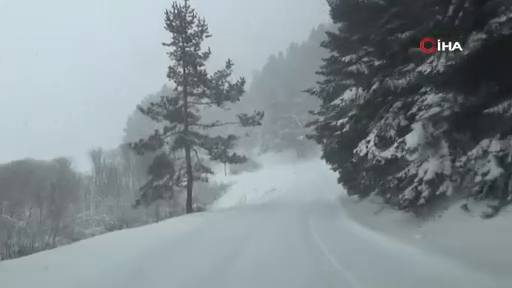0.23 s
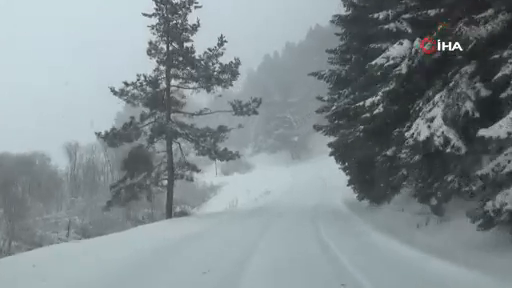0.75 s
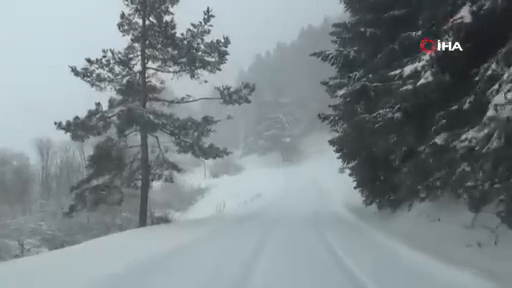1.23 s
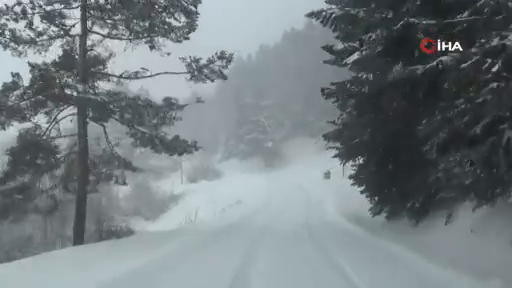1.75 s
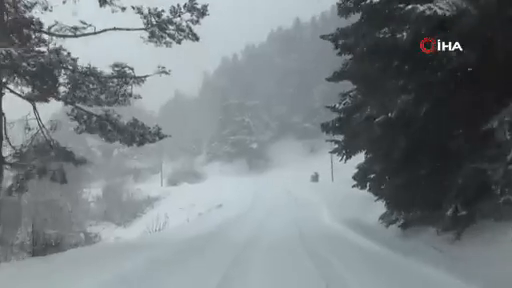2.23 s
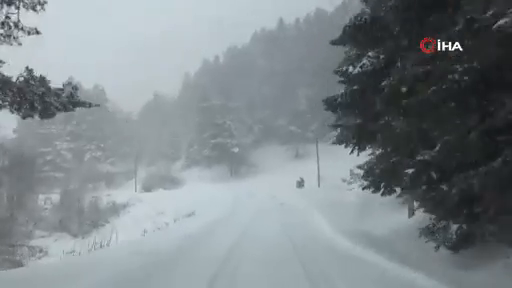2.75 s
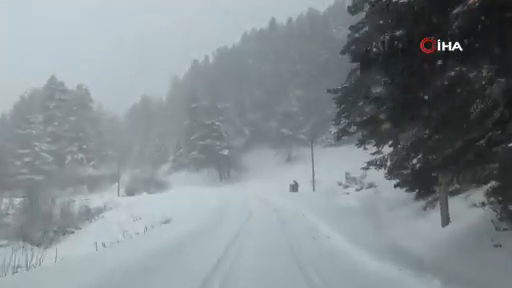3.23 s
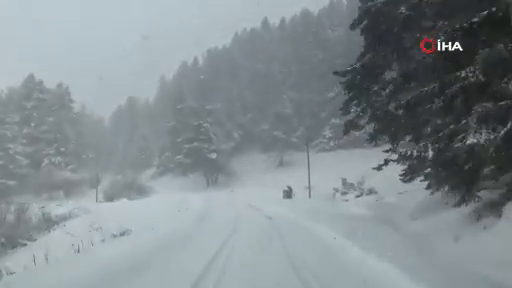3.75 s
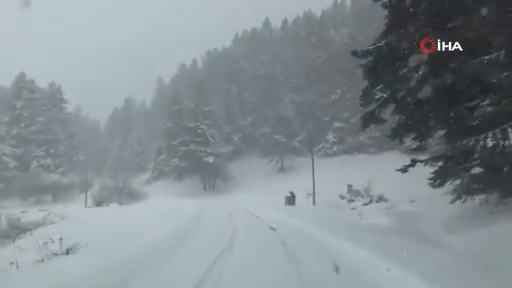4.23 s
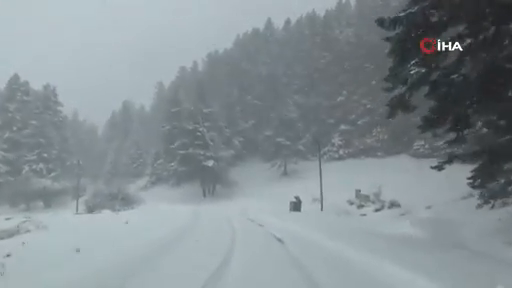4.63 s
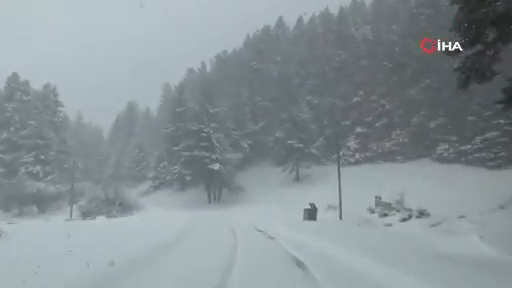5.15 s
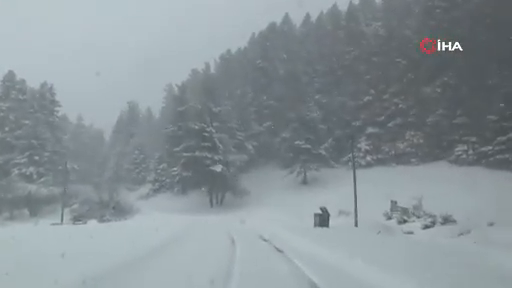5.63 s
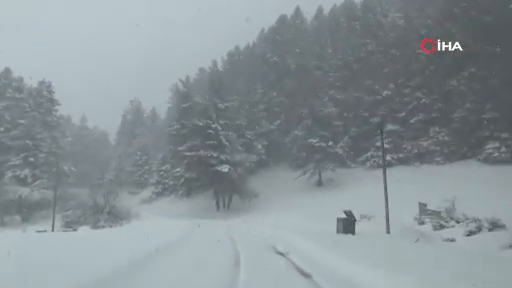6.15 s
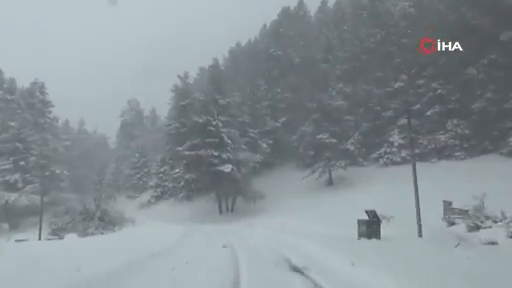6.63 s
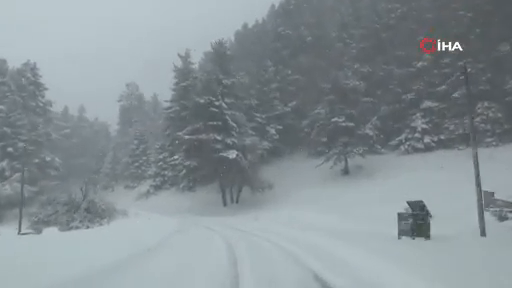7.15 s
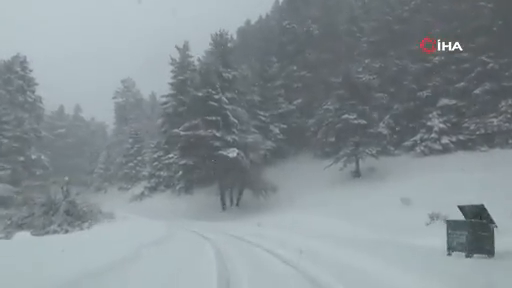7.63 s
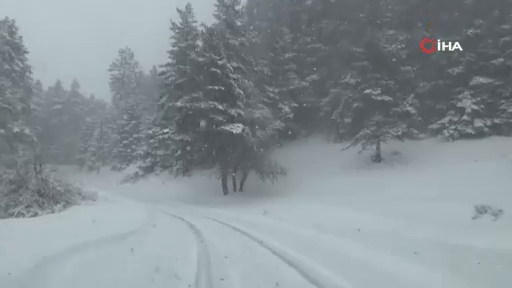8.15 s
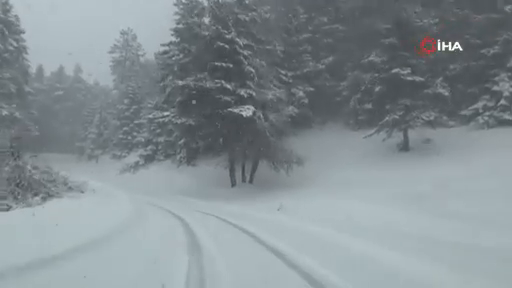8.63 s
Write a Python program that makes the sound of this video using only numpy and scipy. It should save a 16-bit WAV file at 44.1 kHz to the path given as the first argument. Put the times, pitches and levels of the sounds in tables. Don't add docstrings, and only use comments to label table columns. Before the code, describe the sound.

Inside a car rolling along a rough snowy track: deep booming rumble, low engine hum, soft snow hiss, ticking ice crumbs and late suspension thumps.

```python
import sys
import numpy as np
from scipy import signal
from scipy.io import wavfile
from scipy.ndimage import uniform_filter1d

SR = 44100
rng = np.random.default_rng(int(sys.argv[2]) if len(sys.argv) > 2 else 0)


def magnitude_from_level(level_db):
    exponent = np.asarray(level_db, float) / 20
    return 10 ** exponent


def int16_out(signal):
    q = np.round(np.clip(np.atleast_2d(signal).T, -1, 1) * 32767)
    wavfile.write(sys.argv[1], SR, q.astype(np.int16))


N = 392490


def evened(x):
    return x / np.sqrt(np.mean(x ** 2) + 1e-20)


def read(points, hz):
    f, value = np.transpose(points)
    return np.interp(np.log(hz + 1), np.log(f + 1), value)


def column(rows, t, order):
    rows = np.array(rows)
    return np.interp(t, rows[:, 0], rows[:, order])


def add(mix, s, sound):
    part = mix[:, round(s * SR):][:, :sound.shape[-1]]
    part += sound[..., :part.shape[1]]


def band(x, lo_hz, hi_hz):
    return signal.sosfilt(signal.butter(2, [lo_hz, hi_hz], "bandpass", fs=SR, output="sos"), x)


# [f/Hz, likeness 0-1]
LIKENESS = [(25, 0.999), (60, 0.995), (120, 1), (240, 0.65), (470, 0.81), (930, 0.55), (1840, 0.65),
            (3660, 0.46), (7250, 1), (14400, 1)]
# [f/Hz, level/dB]
LEFT_LEAN = [(60, -0.6), (130, 2.5), (290, -3.5), (630, -1), (1370, -1.5), (3010, -0.5), (6580, 0.5),
             (14400, -1)]
# [f/Hz, phase/rad]
LEFT_LEAD = [(25, -0.13), (60, -0.23), (125, -0.4), (260, -0.52), (520, -0.32), (1030, -0.63),
             (1810, -0.16), (2330, 0.064), (5080, 0.14), (7750, 0.73), (9910, 0.3), (14600, 0.2)]


def wash(size, colour_db, layers, patchy_db, flicker_db, steady):
    hop = size // 4
    frames, hz = N // hop + 5, np.fft.rfftfreq(size, 1 / SR)
    a, b, c, d, patches = rng.standard_normal((frames, len(hz), 5)).T
    patches = uniform_filter1d(patches, size=8, axis=0)
    patches = evened(uniform_filter1d(patches, size=10, axis=1))
    flicker = evened(uniform_filter1d(rng.standard_normal(frames), size=6))

    same = np.clip(read(LIKENESS, hz), 0, 1)[:, None]
    left = a + 1j * b
    right = same * left + np.sqrt(1 - same ** 2) * (c + 1j * d)
    right = right * np.exp(-1j * read(LEFT_LEAD, hz))[:, None]
    lean = magnitude_from_level(read(LEFT_LEAN, hz) / 2)[:, None]
    shade_db = colour_db(hz)[:, None] + patchy_db * patches + flicker_db * flicker
    z = np.array([left * lean, right / lean]) * magnitude_from_level(shade_db)

    out = np.zeros((2, N))
    for lo, hi, level_db in layers:
        share = 1 / np.sqrt((1 + (lo / (hz + 1)) ** 12) * (1 + (hz / hi) ** 12))
        part = signal.istft(z * share[:, None], nperseg=size, noverlap=size - hop)[1][:, :N]
        power = uniform_filter1d((evened(part) ** 2).mean(0), size=3000)
        part = part / (power + .05) ** (steady / 2)
        out += evened(part) * magnitude_from_level(np.interp(np.arange(N) / 64, np.arange(len(level_db)), level_db))
    return out


# [t/s, shaking level/dB]
ROAD = [(0.0, -17.5), (0.02, -17.5), (1.43, -17), (1.58, -12), (1.66, -19.5), (1.98, -11), (2.08, -16),
        (6.96, -13.5), (7.16, -20.5), (7.63, -14), (8.7, -16), (8.9, -15)]
# [t/s, boom lift/dB, drone lift/dB]
SURGES = [(0.02, -1.5, 7.5), (0.35, 5.5, -4), (.72, 5.5, 3.5), (1.2, 1, 3.5), (1.57, 6, -8), (1.8, 2, -3),
          (2.45, 5, -7), (2.04, 4, -5), (2.11, -4, 1.5), (2.68, 6.5, -1), (2.82, -10.5, -2.5),
          (3.07, 0.5, 5.5), (3.47, 5, 1), (3.69, 2.5, 3.5), (3.77, 6, -8), (3.87, -8, 2.5), (4.02, -1.5, 3.5),
          (4.21, 0, 0), (4.45, 1, 0.5), (4.68, 6, 4), (5.06, 1, -5), (5.36, -4, -1.5), (5.6, 1.5, -5),
          (6.08, -3, 4.5), (6.4, 1.5, 0.5), (6.96, -8.5, 4.5), (7.4, -1, 2.5), (7.6, 3.5, 0.5),
          (7.82, -6, 3.5), (8.1, -1, 2.5), (8.4, -3.5, 3), (8.62, -2, 1.5), (8.75, 0.5, 2.5)]


def shake_db(t, order):
    half_width_s = 0.065
    swells = sum(surge[order] * np.exp(-((t - surge[0]) / half_width_s) ** 2) for surge in SURGES)
    return column(ROAD, t, order=1) + swells


# [f/Hz, level/dB per Hz]
BODY = [(8.8, -36), (15, -5.5), (49, 2), (80, -2), (154, -9), (210, -18), (618, -26.5), (875, -35),
        (1020, -36), (1500, -42.5), (1950, -75), (3300, -120)]
# [f/Hz, width/Hz, lift/dB]
CABIN = [(46, 8.8, -2), (64.5, 17, 4), (98.6, 25, 3), (150.6, 25, 7), (256.7, 33, 4.5), (324.5, 74, 3.5),
         (565, 38, -1), (1110, 600, 1)]


def body_colour(hz):
    lifts = sum(db / (1 + (2 * (hz - f) / width) ** 2) for f, width, db in CABIN)
    return read(BODY, hz) + lifts


# [t/s, level/dB]
LOAD = [(0, -3.5), (1.2, -2.5), (2.5, -4.5), (4, -1.5), (4.8, -9.5), (5.1, -0.5), (5.5, 1.5), (6.3, 0),
        (7.2, -0.5), (7.8, 0), (8.35, 2.5), (8.9, -3.5)]


def rumble():
    t = np.arange(0, N, 64) / SR
    load_db = column(LOAD, t, order=1)
    boom = -3.5 + shake_db(t, order=1)
    drone = -7 + shake_db(t, order=2) + 0.24 * load_db + 0.26 * (t - t.mean())
    roar = -28.5 + 0.096 * load_db
    layers = [(0, 85, boom), (85, 200, drone), (200, 1400, roar)]
    return wash(size=8192, colour_db=body_colour, layers=layers,
                patchy_db=1.35, flicker_db=0.42, steady=0.25)


# [t/s, f/Hz, level/dB]
ENGINE = [(0.0, 55.67, -18), (1.56, 47.02, -28), (1.68, 53.16, -14.5), (2.68, 48.17, -15.5),
          (3.37, 56.46, -13.5), (4.34, 46.1, -20), (5.06, 55.64, -14), (5.23, 45.87, -36),
          (6.62, 52.2, -18.5), (8.63, 47.5, -10), (8.9, 42.7, -26)]


def engine():
    t = np.arange(N) / SR
    hz = uniform_filter1d(column(ENGINE, t, order=1), size=8000)
    turn = 2 * np.pi * np.cumsum(hz) / SR
    level_db = column(ENGINE, t, order=2) - 9.0 + np.array([[.4], [-.4]])
    return magnitude_from_level(level_db) * np.sqrt(2) * (np.sin(turn) + magnitude_from_level(-4) * np.sin(2 * turn))


# [f/Hz, width/Hz, level/dB, how far it follows the load/dB per dB, lag/s]
DOOR_MODES = [(611, 99, -41.5, 1.4, 0.063), (597.5, 17.3, -45.5, 2.1, 0.05), (1040, 155, -46, 1.44, 1.27)]


def hum():
    out, t = np.zeros((2, N)), np.arange(N) / SR
    for hz, width, db, follows, lag in DOOR_MODES:
        z = rng.standard_normal((3, N))
        ring = band(z[0] + 0.74 * z[1:], hz - width / 2, hz + width / 2)
        out += evened(ring) * magnitude_from_level(db + follows * column(LOAD, t - lag, order=1))
    return out * magnitude_from_level(np.array([[-.7], [.7]]))


# [t/s, crunch level/dB, time to fade 6 dB/s (0.01 at least),
# spray over crunch/dB]
DRIFTS = [(0.0, -40, -0.1, -4), (.29, -47.5, -0.67, -3), (.92, -55, 1.7, -5.5), (1.24, -47.5, 0.53, -5.5),
          (1.44, -53, -1.7, -9), (1.75, -55, -0.26, -11), (2.02, -44.5, 0.32, -5.5), (2.31, -45, .04, 2),
          (2.75, -50, .45, -1), (3.34, -49, 0.3, -7), (3.63, -47, 0.43, -3.5), (3.97, -41, 0.1, -4.5),
          (4.08, -47.5, 0.1, -6), (4.2, -50, -0.1, -7), (4.26, -43.5, 0.06, -3.5), (4.47, -47.5, 0.1, -16),
          (4.55, -50.5, 0.21, 3), (5.05, -46, -0.23, -2), (5.4, -45.5, 0.35, -7), (5.78, -51, 0.07, 1),
          (6.08, -41.5, 0.09, -7.5), (6.44, -45.5, 0.06, -1.5), (6.64, -42.5, 0.2, -7),
          (6.89, -39.5, 0.01, 1), (7.06, -42, .06, -6.5), (7.28, -51, .03, -4), (7.47, -44.5, .1, -4.5),
          (7.81, -43.5, 0.08, -3), (8.1, -47.5, 0.15, -6), (8.25, -44.5, 0.09, 2), (8.32, -42, 0, -6),
          (8.6, -43, -0.03, -3), (8.38, -43.5, 0, 1), (8.66, -45.5, 0.24, -3), (8.73, -64, -4, -7)]


def drifts(t, base_db, bright):
    power = sum(magnitude_from_level(db + bright * tilt - 6 * abs(t - s) / max(fall, .01)) ** 2
                for s, db, fall, tilt in DRIFTS)
    return 10 * np.log10(magnitude_from_level(base_db) ** 2 + power)


# [f/Hz, level/dB per Hz]
SPRAY = [(760, -5), (1300, 3), (1460, -1.5), (2180, -2), (2770, -7), (5500, -13), (8520, -9), (9310, -12.5),
         (14000, -29.5)]


def snow():
    crumbs_per_s, crumbs_db, fade_s = 150, -7, 0.003
    t = np.arange(0, N, 64) / SR
    crunch = drifts(t, base_db=-51, bright=0)
    spray = drifts(t, base_db=-53, bright=1)
    hiss = wash(size=256, colour_db=lambda hz: read(SPRAY, hz),
                layers=[(1400, 3800, crunch), (3800, 22050, spray)],
                patchy_db=1.4, flicker_db=1.5, steady=0)
    size = magnitude_from_level(4.7 * np.minimum(rng.exponential(1, N), 4))
    size = size * (rng.random(N) < crumbs_per_s / SR)
    puffs = signal.lfilter([1], [1, -np.exp(-1 / (fade_s * SR))], size)
    return hiss * np.sqrt(1 + magnitude_from_level(crumbs_db) * puffs) * magnitude_from_level(-1.27)


# [t/s, bright peak level/dB, body relative to bright/dB, thud relative to bright/dB]
TICKS = [(0.2723, -34, -12, -13), (0.3122, -32, -12, -6), (0.7477, -29.5, -13, -10),
         (0.9837, -27.5, -23, -13), (1.1458, -36, -9, -8), (1.4296, -32.5, -9, -5), (1.5643, -31, -5.5, -6),
         (1.6232, -16, -13.5, -20), (1.735, -36, -12, -1), (1.7604, -35, -15, 0), (1.9235, -33, -15, -10),
         (1.9919, -26, -12, -19), (2.9307, -34.5, -21, -7), (2.9414, -40, -19, -17),
         (2.9716, -39.5, -18, -8), (3.0784, -36.5, -7, -15), (3.2395, -39, -8, -11),
         (3.2765, -37.5, -10, -6), (3.2899, -29.5, -17, -11), (3.3887, -30, -12, -13),
         (3.6441, -22.5, -18, -19), (3.9464, -30.5, -12, -17), (3.9524, -23, -24, -22),
         (3.9604, -27, -12, -8), (3.9964, -29.5, -13, -6), (4.0307, -30, -16.5, -11),
         (4.0607, -32, -15, -8), (4.1001, -36, -17, -1), (4.1904, -39.5, -11, -2), (4.2358, -28, -14, -12),
         (4.2702, -27.5, -11, -15), (4.3036, -36, -18, -8), (4.3555, -42, -8, 2), (4.4034, -40, -18, -6.5),
         (4.4383, -29, -21, -7.5),
         (4.7017, -29.5, -12, -16), (4.762, -38, -11, -11), (4.8184, -30.5, -16, -8),
         (5.028, -25, -22, -13), (5.318, -26, -12, -18), (5.3517, -31.5, -11, -8), (5.484, -42, -7, -1),
         (5.501, -32, -13, -8), (5.6974, -30.5, -13, -5), (5.8606, -29, -18, -11), (5.9144, -34, -13, -29),
         (5.9278, -26, -19, -18), (6.427, -24, -22, -15), (6.5201, -33, -9, -10), (6.8828, -32, -14, -4),
         (7.227, -36.5, -8.5, -7), (7.2734, -32.5, -21, -3), (7.5225, -31, -27, -11),
         (7.7094, -23, -13, -14), (7.8316, -26.5, -23, -18), (7.8725, -23.5, -25, -14),
         (7.9139, -37, -6, -7), (8.0431, -30, -22, -6), (8.1054, -31, -16, -6), (8.2237, -29, -27, -17),
         (8.3809, -32, -14, -3), (8.6792, -27.5, -8, -3), (8.7137, -31, -10, -7), (8.7241, -24, -24, -20),
         (8.8264, -37, -8.5, -1),
         (2.31, -25, -11, -9),
    (2.523, -25, -12, -13),
    (2.726, -37, -8, -6),
    (5.929, -20, -12, -22),
]


def ticks():
    ring_t60_s, click_t60_s, rise_s = 0.034, 0.0033, 0.00033
    echo_s, echo_db = 0.0026, -4
    out, t = np.zeros((2, N)), np.arange(3000) / SR
    rows = TICKS
    noise = rng.standard_normal((len(rows), 3, len(t)))
    fall = magnitude_from_level(-60 * t / ring_t60_s) + 2.0 * magnitude_from_level(-60 * t / click_t60_s)
    for (s, db, body_db, thud_db), z in zip(rows, noise):
        grit = (z[0] + 0.56 * z[1:]) * fall * np.minimum(t / rise_s, 1)
        strike = grit + 9.3 * (t == t[8])
        # (low Hz, high Hz, dB)
        parts = [(9500, 15500, -16), (4500, 9400, 0),
                 (3100, 4900, body_db + 7), (1800, 3100, thud_db + 3)]
        burst = 0
        for lo, hi, lift in parts:
            rung = band(band(strike, lo, hi), lo, hi)
            burst = burst + magnitude_from_level(lift) * rung / abs(rung).max()
        burst = magnitude_from_level(db + 0.35) * burst
        add(out, s + 0.0007, burst * magnitude_from_level(np.array([[.4], [-.4]])))
        add(out, s + 0.0008 + echo_s, burst[::-1] * magnitude_from_level(echo_db))
    return out


def struck(rows, t60_s, fuzz, spread, boost_db):
    out, t = np.zeros((2, N)), np.arange(4000) / SR
    noise = rng.standard_normal((len(rows), 3, len(t)))
    for (s, db, hz), z in zip(rows, noise):
        rattle = evened(band(z[0] + .5 * z[1:], hz / spread, hz * spread))
        ring = fuzz * rattle + np.sin(2 * np.pi * hz * t)
        ring = ring * magnitude_from_level(-60 * t / t60_s) * np.minimum(t / 0.0011, 1)
        add(out, s, magnitude_from_level(db + boost_db) * ring / abs(ring).max())
    return out


# [t/s, peak level/dB, f/Hz]
KNOCKS = [(.581, -39, 420), (.901, -38, 794), (3.771, -29, 395), (3.797, -39.5, 700), (6.022, -24, 403),
          (8.229, -31, 450), (8.625, -24, 640), (8.859, -28, 640), (1.738, -29, 611), (3.937, -32, 645),
          (3.969, -24, 471), (3.997, -23.5, 700), (5.776, -31, 603), (6.91, -22, 545), (6.949, -24, 557),
          (7.708, -25, 450), (8.267, -20.5, 605), (8.286, -22, 585), (8.544, -23, 560), (8.552, -29, 705),
          (8.597, -21.5, 544), (8.678, -19.5, 713), (8.883, -25, 600)]


def trim_knocks():
    return struck(KNOCKS, t60_s=0.1, fuzz=1.0, spread=1.5, boost_db=2.0)


# [t/s, peak level/dB, f/Hz]
SNAPS = [(1.0241, -34, 1753), (1.624, -26, 2900), (1.7355, -29, 1980), (2.5232, -23.5, 2100),
         (3.2904, -29, 1890), (3.6112, -25.5, 1940), (3.9265, -33.5, 2070), (3.9602, -35, 2390),
         (4.2018, -27, 2350), (4.8993, -34.5, 1910), (5.096, -33, 2110), (5.1477, -32, 1820),
         (5.352, -33, 2390), (6.425, -36, 1460), (6.876, -26, 1960), (6.9022, -29.5, 1906),
         (6.942, -26, 1960), (7.0273, -42, 1730), (7.7097, -42, 1440), (7.873, -30.5, 2950),
         (8.2347, -40, 1400), (8.266, -28.5, 2450), (8.31, -24.5, 1810), (8.3597, -25, 1450),
         (8.64, -27.5, 1800), (8.79, -42, 2300), (5.485, -32, 2400), (8.663, -28, 1540),
         (8.6787, -21.5, 2370)]


def panel_snaps():
    return struck(SNAPS, t60_s=0.035, fuzz=.8, spread=1.2, boost_db=-1.5)


# [t/s, peak level/dB, f/Hz]
THUMPS = [
    (3.965, -17, 293),
    (8.39, -24, 149),
    (8.7, -14, 150),
    (8.75, -25, 149),
    (8.549, -15.5, 352),
    (8.568, -11.5, 199),
]


def suspension_thumps():
    return struck(THUMPS, t60_s=0.092, fuzz=2.7, spread=1.55, boost_db=-0.5)


# [f/Hz, level/dB, time to fade 60 dB/s]
KEYS = [
    [(4829, -6, .11), (7800, -1, .06), (9044, -5, .045), (10240, -6, .05), (11320, -1, .025),
     (13400, -20, .04)],
    [(6864, -5, .05), (7655, -2, .04), (8323, -2, .09), (9485, -4, .1), (10630, 0, .03), (11800, -14, .05)],
]
# [t/s, peak level/dB, which key, lowest note rung f/Hz]
CHINKS = [
    (4.505, -45, 1, 9600),
    (4.53, -30, 0, 4000),
    (4.566, -42, 1, 9600),
    (4.731, -36, 1, 6000),
]


def keys():
    out, t = np.zeros((2, N)), np.arange(6000) / SR
    scrapes = rng.standard_normal((len(CHINKS), 900)) * magnitude_from_level(-14 * t[:900] / t[900])
    for (s, db, key, lowest_hz), scrape in zip(CHINKS, scrapes):
        notes = [note for note in KEYS[key] if note[0] > lowest_hz]
        ring = sum(magnitude_from_level(d - 60 * t / t60) * np.sin(2 * np.pi * f * t) for f, d, t60 in notes)
        ring = signal.fftconvolve(ring, scrape)
        add(out, s, magnitude_from_level(db) * ring / abs(ring).max())
        grit = band(band(scrape, 6300, 14500), 6300, 11500)
        add(out, s, magnitude_from_level(db + 4) * grit / abs(grit).max())
    return out


# [t/s, f/Hz, level/dB]
WHINE = [
    (5.0, 590, -44),
    (5.15, 635, -44),
    (5.31, 668, -47),
    (5.37, 679, -38.5),
    (5.72, 685, -38.5),
    (5.88, 652, -44),
    (6.1, 620, -42),
    (6.3, 600, -43),
    (6.4, 597, -50),
]


def whine():
    out, t = np.zeros((2, N)), np.arange(WHINE[0][0], WHINE[-1][0], 1 / SR)
    waver = 1 + 0.0036 * evened(uniform_filter1d(rng.standard_normal(len(t)), size=1500))
    turn = 2 * np.pi * np.cumsum(column(WHINE, t, order=1) * waver) / SR
    tone = np.sqrt(2) * np.sin(turn) * signal.windows.tukey(len(t), .2)
    level_db = column(WHINE, t, order=2) - 1.5 + np.array([[-1.2], [1.2]])
    add(out, t[0], tone * magnitude_from_level(level_db))
    return out


def scene():
    steady = rumble() + engine() + hum() + snow()
    knocking = ticks() + trim_knocks() + panel_snaps() + suspension_thumps()
    return steady + knocking + keys() + whine()


def roll_off(x):
    return signal.sosfilt(signal.butter(12, 14990, fs=SR, output="sos"), x)


def record(dry):
    power = uniform_filter1d((dry ** 2).mean(0), size=600)
    peak_db = 10 * np.log10(abs(power) + 1e-12)
    over_db = uniform_filter1d(np.maximum(peak_db + 12.5, 0), size=600)
    rounded = 1.154 * np.tanh(dry / 1.146)
    held = rounded * magnitude_from_level(0.5 - 0.25 * over_db)
    edge = signal.firwin2(1023, [0, 14250, 14400, 15000, SR / 2], [1, 1, .02, .035, 0], fs=SR)
    return roll_off(signal.oaconvolve(held, edge[None], "same"))


dry = scene()
out = record(dry)
int16_out(out)
```